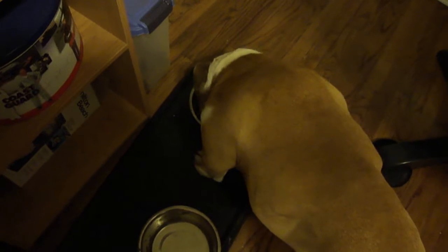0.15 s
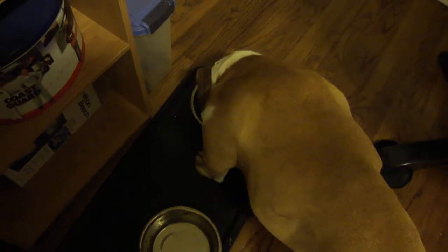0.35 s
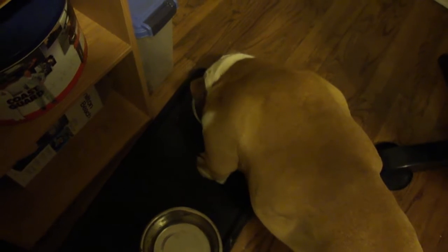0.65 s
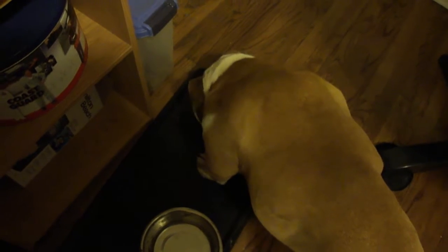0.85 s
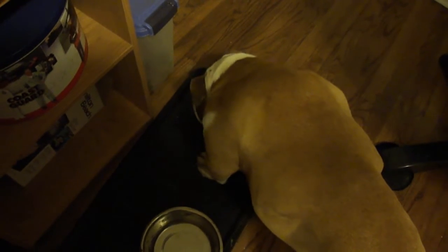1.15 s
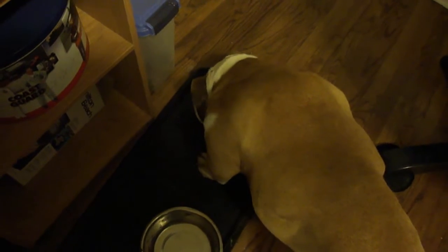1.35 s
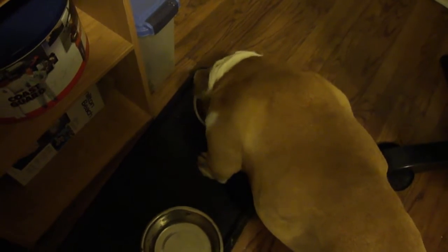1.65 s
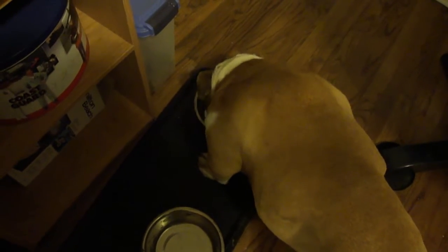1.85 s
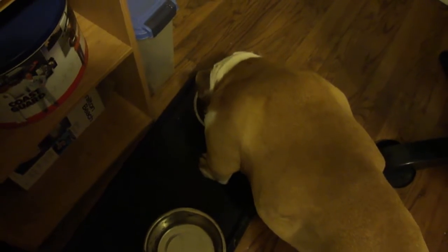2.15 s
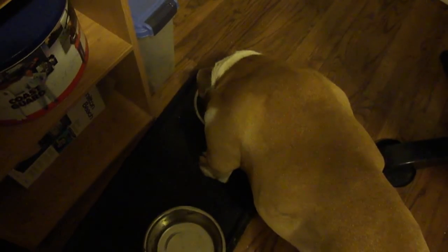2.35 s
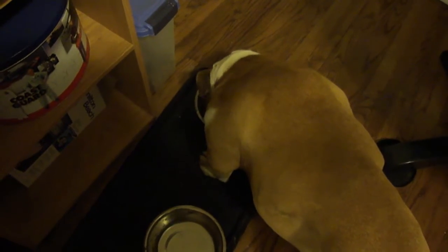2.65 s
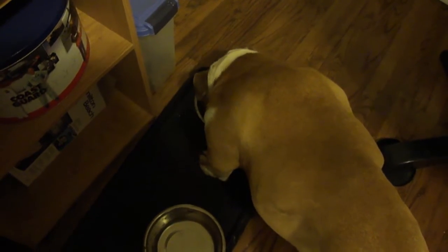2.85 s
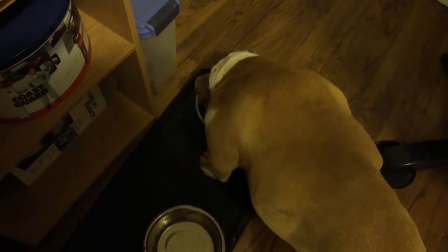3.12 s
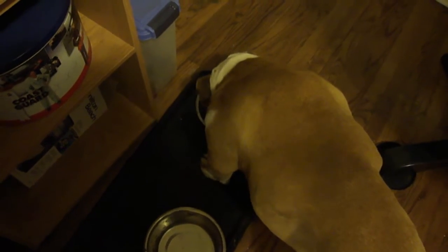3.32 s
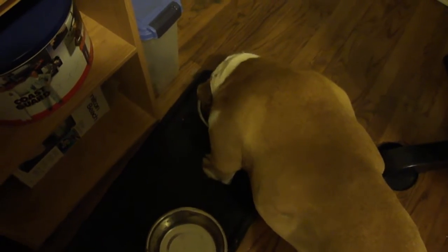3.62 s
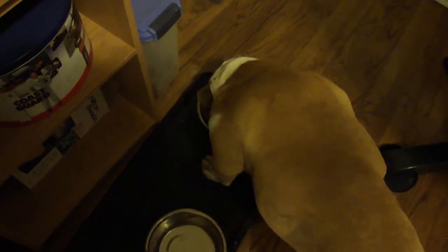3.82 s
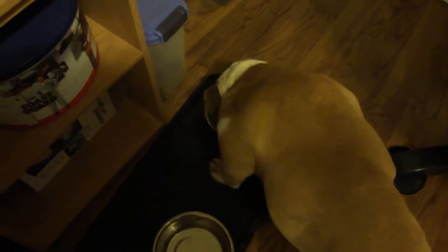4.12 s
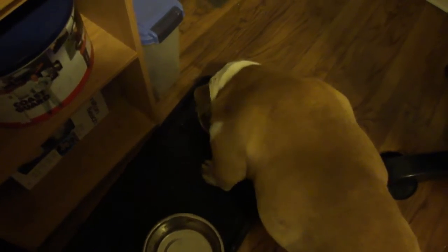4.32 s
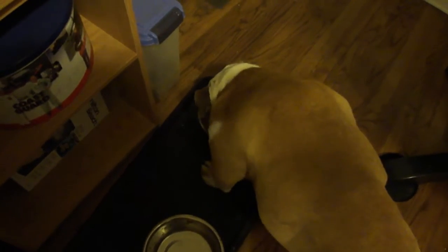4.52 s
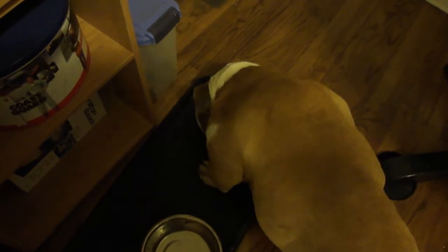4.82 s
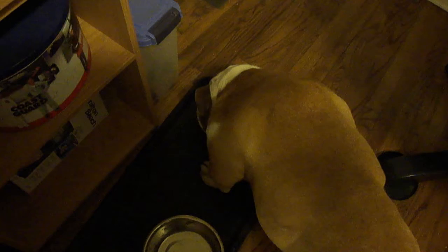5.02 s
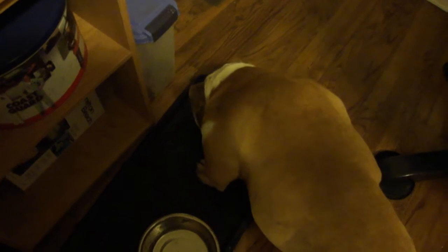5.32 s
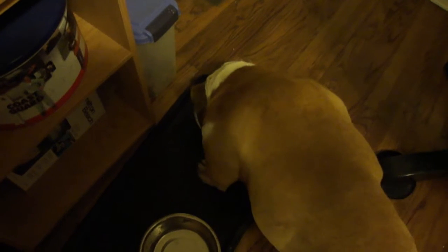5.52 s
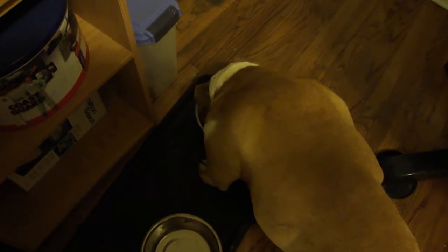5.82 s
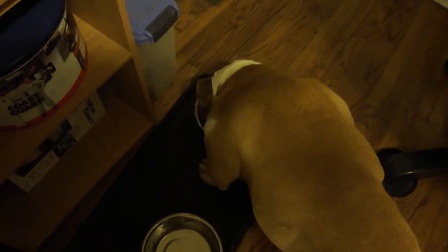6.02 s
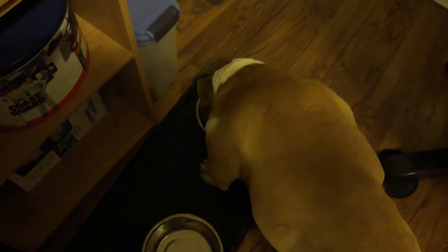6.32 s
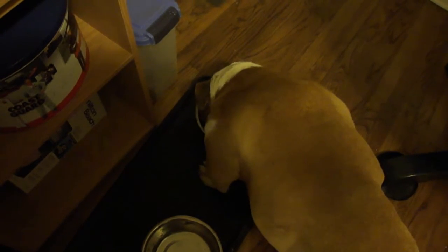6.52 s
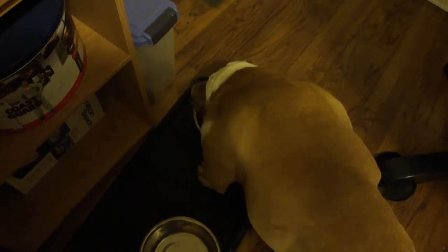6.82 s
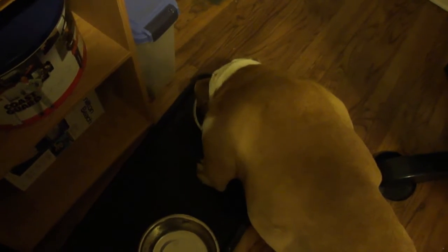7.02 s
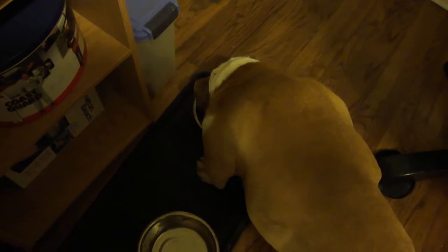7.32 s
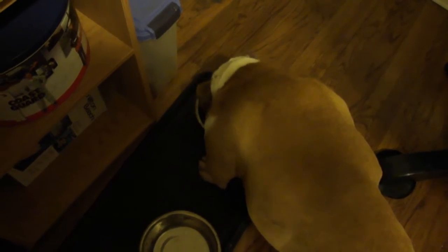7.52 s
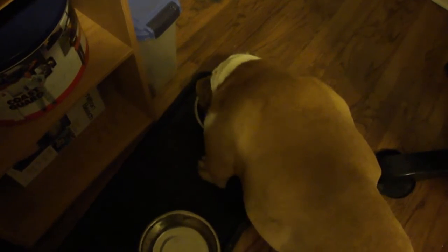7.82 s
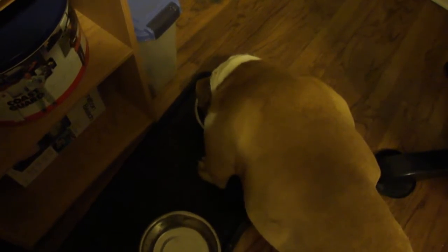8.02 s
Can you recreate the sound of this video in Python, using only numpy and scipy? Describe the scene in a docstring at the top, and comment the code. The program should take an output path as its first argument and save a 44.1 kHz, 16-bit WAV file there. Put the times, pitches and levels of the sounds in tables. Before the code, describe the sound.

Close to the microphone, a dog laps and chomps wet food from start to finish. The quick, even mouthfuls squish, smack and slurp, with small gulps and bright snaps of saliva, all colored by the hollow of the bowl. Now and then there is a sharp click or a very faint throat rumble. The small indoor room adds a short echo and soft hiss.

```python
"""Wet food squelches as a dog laps and gulps from a bowl on the hard floor of a small room.
Bubbles pop in the mash, tongue and lips smack, air pockets gulp low and saliva threads snap;
the bowl's hollow rings with all of it. Now and then a thin tone lingers or the throat rumbles.
One microphone stands close by, with the room's short echo, hiss and a faint hum behind the dog."""
import sys
import numpy as np
from scipy import signal
from scipy.fft import rfft, irfft
from scipy.io import wavfile
from scipy.ndimage import uniform_filter1d

SR = 44100
rng = np.random.default_rng(int(sys.argv[2]) if len(sys.argv) > 2 else 0)


def to_wav(sig):
    """Store sig (one row per channel, or 1-D mono) as 16-bit WAV at the path in sys.argv[1].

    Samples outside -1..1 are clipped; the rate is SR.
    """
    pcm = np.clip(np.atleast_2d(sig), -1, 1) * 32767
    pcm = np.round(pcm).astype(np.int16)
    wavfile.write(sys.argv[1], SR, pcm.T)  # frames by channels


N = 359855

# tongue plunges, then jaws squeeze: start_s, plunge_db, wait_s, squeeze_db, settle_db_per_s
BITES = [(.01, -40.5, 0.11, -37.5, 60), (0.177, -27.5, 0.11, -20, 140), (0.511, -23.5, 0.12, -17.5, 166),
         (0.849, -29, 0.12, -19.5, 188), (1.347, -23.5, 0.12, -18, 169), (1.659, -34, 0.098, -18, 108),
         (1.94, -38, 0.087, -31, 66), (2.093, -18.5, 0.018, -20, 155), (2.425, -42, 0.013, -50, 203),
         (2.514, -23, 0.13, -21.5, 193), (2.865, -17, 0.097, -17, 195), (3.216, -21, 0.068, -17.5, 242),
         (3.688, -25.5, 0.1, -20.5, 92), (4.012, -22, 0.096, -19.5, 146), (4.324, -26.5, 0.099, -21.5, 138),
         (4.802, -25.5, 0.1, -23.5, 136), (5.142, -23, 0.09, -19.5, 156), (5.484, -22.5, 0.087, -21.5, 174),
         (5.943, -25.5, 0.13, -25, 133), (6.289, -24.5, 0.095, -16, 176), (6.597, -29.5, 0.11, -20.5, 185),
         (7.089, -23.5, 0.12, -22.5, 128), (7.444, -18, 0.086, -20, 106), (7.741, -19.5, 0.12, -19, 185)]
# tone colour of the squelching food: frequency_hz, density_db
MASH_SPECTRUM = [(59, -64), (100, -73), (246, -8), (379, 9), (656, 0.5), (952, 1), (1380, -10.5),
                 (1930, -10.5), (3750, -22.5), (10800, -43), (14000, -68), (22000, -120)]
# small bubbles in the mash: start_s, level_db, pitch_hz
POPS = [(0.103, -34.5, 1000), (0.166, -24.5, 1250), (0.176, -24, 1003), (0.178, -33, 1506),
        (0.237, -27.5, 1110), (0.473, -27.5, 1115), (0.509, -27.5, 1088), (0.549, -26, 987),
        (0.698, -24.5, 1013), (0.866, -27, 1050), (0.934, -21.5, 1020), (0.981, -21.5, 860),
        (1.055, -30, 1020), (1.225, -41, 886), (1.253, -36, 1003), (1.346, -21.5, 1046), (1.47, -13, 998),
        (1.662, -19, 1075), (1.761, -15.5, 1042), (1.802, -19, 1001), (2.015, -29.5, 896),
        (2.064, -28, 980), (2.092, -18, 1040), (2.123, -18.5, 1220), (2.139, -14.5, 865),
        (2.425, -33.5, 1000), (2.525, -28.5, 1054), (2.543, -23, 990), (2.626, -19.5, 1030),
        (2.644, -16.5, 1167), (2.823, -28.5, 1230), (2.862, -27, 984), (2.872, -19.5, 933),
        (2.909, -40, 1080), (2.953, -20, 940), (2.964, -15, 1212), (3.142, -34, 1160), (3.174, -33.5, 940),
        (3.215, -22.5, 980), (3.277, -39, 1180), (3.316, -25, 1039), (3.6, -38, 925), (3.694, -32, 940),
        (3.74, -26.5, 1060), (3.802, -31, 1127), (3.815, -22.5, 1120), (4.022, -23.5, 1060),
        (4.04, -22.5, 1012), (4.059, -40, 1054), (4.111, -16.5, 960), (4.112, -20, 754), (4.15, -24, 1020),
        (4.317, -27, 2860), (4.323, -33, 936), (4.353, -25, 920), (4.407, -25, 1018), (4.447, -19, 777),
        (4.728, -39, 960), (4.808, -22, 995), (4.85, -19, 780), (4.908, -16, 747), (5.139, -19.5, 1105),
        (5.146, -16.5, 987), (5.234, -14, 824), (5.321, -31, 1130), (5.403, -30.5, 1210), (5.488, -33, 960),
        (5.541, -32, 937), (5.583, -23.5, 880), (5.649, -28, 1060), (5.867, -38, 1066), (5.958, -25.5, 930),
        (6.004, -24, 1046), (6.079, -22.5, 1021), (6.362, -27, 1060), (6.383, -18, 1077),
        (6.404, -19.5, 1174), (6.684, -28, 1094), (6.71, -18, 988), (6.709, -44, 1580), (7.101, -37, 912),
        (7.197, -20, 1030), (7.224, -19, 898), (7.376, -32, 1210), (7.399, -27.5, 1450),
        (7.446, -18.5, 937), (7.52, -20, 1048), (7.545, -17, 1010), (7.746, -22.5, 1404), (7.781, -18, 915),
        (7.865, -19.5, 754), (7.872, -17, 1037), (7.912, -28, 1040)]
# tongue and lips tearing free: start_s, level_db, mouth_hz, width_ratio
SMACKS = [(0.169, -27, 2340, 0.55), (0.228, -21.5, 2480, 1), (0.285, -36, 3660, 0.4),
          (0.501, -22, 1490, 0.56), (0.57, -25.5, 1960, 1), (0.627, -25, 2300, 0.24),
          (0.845, -25.5, 2260, 1), (0.928, -28, 2200, 1), (1.345, -16, 1790, 0.97),
          (1.392, -31.5, 3660, 0.35), (1.433, -27.5, 4100, 0.37), (1.446, -18, 1710, 1),
          (1.517, -28, 3300, 0.98), (1.662, -16.5, 1840, 1), (1.697, -22, 3560, 0.34), (1.78, -18, 1666, 1),
          (1.809, -25.5, 2500, 0.75), (1.952, -28, 1884, 0.81), (2.004, -33, 3050, 0.59),
          (2.129, -23.5, 1550, 1), (2.236, -34.5, 2050, 0.27), (2.423, -39.5, 2780, 0.27),
          (2.518, -27.5, 3210, 0.19), (2.544, -26, 1640, 0.56), (2.571, -29.5, 2630, 0.17),
          (2.614, -29, 1530, 0.8), (2.634, -14, 2094, 0.33), (2.858, -25, 2030, 0.39),
          (2.865, -19, 2750, 1), (2.951, -29, 1770, 0.35), (2.9648, -21, 3050, 1), (3.173, -32, 1640, 0.65),
          (3.213, -27, 3790, 0.51), (3.307, -28, 3660, 0.27), (3.687, -15.5, 2730, 0.44),
          (3.7918, -18.5, 2340, 0.65), (3.8153, -25, 1440, 0.37), (4.007, -18.5, 1980, 0.48),
          (4.034, -23.5, 3470, 0.87), (4.1083, -22.5, 2050, 0.49), (4.122, -18.5, 1686, 0.44),
          (4.318, -18.5, 2120, 0.53), (4.373, -31.5, 3747, 0.24), (4.5274, -31.5, 1970, 0.17),
          (4.8064, -24, 2270, 0.84), (4.848, -22.5, 1800, 1), (4.973, -29, 1590, 0.55),
          (5.14, -18, 2740, 0.67), (5.203, -27, 2480, 0.89), (5.232, -19.5, 1640, 0.78),
          (5.474, -36, 2520, 0.69), (5.9418, -23, 2633, 0.47), (5.998, -23, 1880, 1),
          (6.0672, -15.5, 1730, 1), (6.1083, -22, 2560, 0.42), (6.266, -30, 1450, 1),
          (6.383, -13.5, 1990, 1), (6.393, -19, 3300, 0.49), (6.587, -23, 1870, 0.96),
          (6.598, -21.5, 1740, 0.75), (6.7155, -18.5, 1354, 0.96), (7.085, -23.5, 2040, 0.69),
          (7.147, -24.5, 1990, 0.23), (7.1495, -25.5, 2770, 0.34), (7.197, -24, 1635, 0.87),
          (7.224, -27.5, 2720, 0.42), (7.357, -30, 2070, 0.47), (7.3782, -32, 1850, 0.26),
          (7.4102, -30, 3340, 1), (7.508, -30, 1700, 0.48), (7.526, -20.5, 1460, 0.5),
          (7.742, -13, 1980, 0.55), (7.865, -20, 1840, 0.83)]
# large air pockets under the tongue: start_s, level_db, pitch_hz, ring_s
GULPS = [(0.202, -27, 498, 0.05), (0.283, -17.5, 350, 0.028), (0.306, -22, 445, 0.016),
         (0.527, -24, 456, 0.053), (0.614, -15, 410, 0.025), (0.895, -30, 443, 0.027),
         (0.925, -19.5, 367, 0.014), (0.96, -12.5, 474, 0.0081), (1.355, -27, 386, 0.064),
         (1.446, -17.5, 406, 0.016), (1.7, -13, 394, 0.022), (1.757, -12.5, 406, 0.012),
         (2.048, -36, 510, 0.043), (2.086, -22.5, 271, 0.022), (2.095, -21.5, 405, 0.042),
         (2.545, -33, 440, 0.025), (2.614, -13.5, 376, 0.014), (2.872, -17.5, 426, 0.029),
         (3.214, -22.5, 473, 0.027), (3.277, -17.5, 445, 0.0053), (3.458, -32.5, 424, 0.0072),
         (3.692, -26, 415, 0.021), (3.718, -24.5, 514, 0.021), (3.792, -22.5, 433, 0.075),
         (4.033, -22, 407, 0.04), (4.106, -22, 500, 0.013), (4.404, -19, 397, 0.013),
         (4.439, -16.5, 400, 0.0083), (4.898, -11.5, 452, 0.018), (5.14, -31, 353, 0.03),
         (5.205, -20.5, 361, 0.055), (5.485, -24.5, 406, 0.027), (5.54, -21, 342, 0.026),
         (5.988, -34, 420, 0.037), (6.042, -23.5, 455, 0.02), (6.295, -17, 428, 0.018),
         (6.368, -14, 480, 0.022), (6.642, -11, 393, 0.032), (6.712, -15, 417, 0.02),
         (7.199, -9.5, 460, 0.018), (7.445, -8, 428, 0.0081), (7.52, -10.5, 474, 0.015),
         (7.61, -22.5, 566, 0.039), (7.778, -13, 399.6, 0.011), (7.859, -19.5, 432, 0.019)]
# saliva threads snapping: start_s, level_db, centre_hz
SALIVA_SNAPS = [(0.285, -20.5, 4050), (.372, -36.5, 5800), (0.53, -33.5, 6100), (1.343, -30, 5350),
                (1.445, -26.5, 5750), (1.594, -38.5, 4950), (1.66, -32.5, 4150), (1.6989, -23, 4630),
                (1.78, -29, 6100), (1.939, -36, 4870), (2.098, -32.5, 6400), (2.36, -52, 9300),
                (2.5036, -47, 5530), (2.569, -38, 6290), (2.616, -29.5, 5870), (2.859, -31, 6705),
                (3.2136, -30.5, 6000), (3.687, -35, 8900), (3.7205, -31, 5440), (3.803, -35, 5840),
                (4.034, -32, 9200), (4.798, -38, 5270), (4.848, -28.5, 5340), (4.951, -43, 8850),
                (5.142, -34, 5600), (5.239, -32, 5800), (5.484, -31, 3650), (5.506, -34, 5960),
                (5.612, -42, 7860), (5.937, -39, 5250), (6.039, -30.5, 5870), (6.291, -39, 4870),
                (6.593, -40, 5050), (6.643, -25.5, 4600), (7.0836, -35, 5650), (7.149, -31, 7250),
                (7.364, -35.5, 6500), (7.442, -27, 6150), (7.52, -32.5, 5000), (7.741, -29.5, 3970),
                (7.78, -34, 5200)]
# air pockets squeezed small: start_s, level_db, start_hz, growth_per_s, length_s
CHIRPS = [(0.622, -18.5, 622, 34, 0.031), (3.775, -31, 1124, 23.6, 0.035), (7.866, -21, 1408, 16, 0.016)]
# thin tones lingering after bites: start_s, level_db, pitch_hz, length_s
THIN_TONES = [(1.945, -39, 2010, 0.11), (3.182, -36, 2015, 0.057), (3.845, -46, 953, 0.33),
              (4.12, -32, 568.4, 0.13), (6.731, -41.5, 2073, 0.1), (6.803, -45, 2420, 0.078)]
# rumbles in the throat: start_s, level_db, pitch_hz
GRUNTS = [(2.1, -54.5, 197), (3.85, -48, 162), (4.401, -54, 210)]
# dry single clicks: start_s, level_db
TICKS = [(2.776, -25), (2.793, -40), (3.14, -36), (3.175, -33), (6.069, -18), (6.3846, -14)]
# resonances of the bowl's hollow: pitch_hz, width_hz, level_db
BOWL_MODES = [(374.3, 25, 4), (413, 35, -5), (959, 35.6, 8), (1143, 48, 10), (1570, 63, 9), (1924, 30, 5),
              (3650, 850, 4.5)]
# early reflections at the microphone: delay_s, level_db
ECHOES = [(0.025, -14.5), (0.035, -13), (.049, -18.5)]
# the room's reverberation: frequency_hz, t60_s
ROOM_DECAY = [(150, 0.46), (400, 0.53), (1000, 0.47), (2800, 0.43), (7000, 0.36)]
# room and microphone hiss: frequency_hz, density_db
HISS_SPECTRUM = [(15, -48), (25, -16.5), (196, 6), (361, 3), (813, 7), (1350, 7.5), (1660, 6), (2310, -1.5),
                 (3640, -5.5), (4350, -8), (10900, -12), (14100, -51), (22000, -120)]

BODY_HZ = 604  # below this the mash thins out as it settles


def gain_of(db):
    return 10 ** (np.asarray(db) / 20)


def unit_rms(x):
    return x / np.sqrt(np.mean(x ** 2) + 1e-20)


def curve_at(points, hz):
    knots_hz, values = np.transpose(points)
    return np.interp(np.log(hz + 1), np.log(knots_hz + 1), values)


def add(mix, start_s, sound):
    part = mix[round(start_s * SR):][:len(sound)]
    part += sound[:len(part)]


def resonate(x, hz, width_hz):
    pole = np.exp((2j * np.pi * hz - np.pi * width_hz) / SR)
    return 2 * signal.lfilter([1 - abs(pole)], [1, -pole], x).real


def phase_wobble(noise, samples):
    return 0.7 * unit_rms(uniform_filter1d(uniform_filter1d(noise, samples), samples))


def puff(length_s, rise_s, crackle_db):
    """Crackly noise and its envelope: quick rise, short hold, rounded fall."""
    hiss, crackle = rng.standard_normal((2, SR // 10))
    t = np.arange(len(hiss)) / SR
    envelope = (1 - np.exp(-t / rise_s)) * np.exp(-(t / length_s) ** 2)
    return hiss * gain_of(crackle_db * unit_rms(uniform_filter1d(crackle, size=90))), envelope


def bite_motion(t, contact_db=-15, approach_db_per_s=123, plunge_s=0.015, sag_db=8):
    """Each bite nears the mash, plunges, sags, squeezes and settles; the loudest sets level and colour."""
    start_s, plunge_db, wait_s, squeeze_db, settle_db_per_s = np.transpose(BITES)[:, :, None]
    since_s = t - start_s
    settling_s = np.maximum(since_s - wait_s, 0)
    progress = np.clip(since_s / wait_s, 0, 1)
    near_db = contact_db * np.clip(-since_s / plunge_s, 0, 1) + approach_db_per_s * np.minimum(since_s, 0)
    push_db = plunge_db + (squeeze_db - plunge_db) * progress - sag_db * np.sin(np.pi * progress)
    level_db = push_db + near_db - settle_db_per_s * settling_s
    tilt_db_per_oct = np.clip(4.5 - 17 * settling_s, -8, 8)  # the treble dies first
    thin_db_per_oct = 0.5 * (1 - progress) + 94 * settling_s  # the bass is fullest at the squeeze
    loudest = level_db.argmax(axis=0), np.arange(len(t))
    return level_db[loudest], tilt_db_per_oct[loudest], thin_db_per_oct[loudest]


def squelch(step=32):
    """Many tiny bubbles of every size burst at random, more loudly as the tongue pushes."""
    level_db, tilt, thinning = bite_motion(np.arange(N // step + 1) * step / SR)
    out = np.zeros(N)
    for hz in np.geomspace(150, 10500, num=40):
        bursts = np.flatnonzero(rng.random(N) < 0.09 * hz / SR)
        spread_db = 2.5 * np.minimum(rng.exponential(1, len(bursts)), 2 if hz < BODY_HZ else 4)
        bunching = unit_rms(uniform_filter1d(rng.standard_normal(len(level_db)), size=24))
        clumps_db = 5.14 * np.clip(bunching, -3, 1.5 if hz < 4000 else 2.5)
        colour_db = tilt * np.log2(hz / 2000) + thinning * min(np.log2(hz / BODY_HZ), 0)
        impulses = np.zeros(N)
        impulses[bursts] = gain_of(spread_db + (level_db + colour_db + clumps_db)[bursts // step])
        cycles = np.arange(round(9 * SR / hz)) * hz / SR
        envelope = np.sin(np.pi * cycles / cycles[-1]) * np.exp(-0.2 * cycles)
        bubble = envelope * np.sin(2 * np.pi * cycles * (1 + 0.013 * cycles))
        band_gain = gain_of(curve_at(MASH_SPECTRUM, hz)) * np.sqrt(hz / 1000)
        out += band_gain * signal.oaconvolve(impulses, bubble)[:N]
    return gain_of(-6) * out


def bubbles(rows, rise_s, climb_per_s):
    """An air pocket rings as a dying sine that climbs as it shrinks; its soft walls make it flutter."""
    out = np.zeros(N)
    for start_s, db, hz, ring_s in rows:
        t = np.arange(0, ring_s, 1 / SR)
        envelope = (1 - np.exp(-t / rise_s)) ** 2 * gain_of(-60 * (t / ring_s) ** 1.65)
        flutter = phase_wobble(rng.standard_normal(SR // 10), samples=90)[:len(t)]
        tone = np.sin(2 * np.pi * hz * t * (1 + climb_per_s * t) + flutter - flutter[0])
        add(out, start_s, gain_of(db) * envelope / envelope.max() * tone)
    return out


def smacks():
    """A wet film tears in a crackly puff, heard through the mouth cavity and three pitched pockets."""
    out = np.zeros(N)
    scatter = np.clip(rng.standard_normal((len(SMACKS), 3)), -2, 2)
    for (start_s, db, mouth_hz, width_ratio), offsets in zip(SMACKS, scatter):
        tear, envelope = puff(length_s=0.019, rise_s=0.00019, crackle_db=0.5)
        envelope *= 1 + 0.93 * np.exp(-np.arange(len(envelope)) / (0.0011 * SR))  # it snaps first
        for _ in range(3):  # three passes give the cavity steep skirts
            tear = resonate(tear, mouth_hz, max(width_ratio, 0.2) * mouth_hz)
        pockets_hz = mouth_hz * np.exp(0.219 * width_ratio * offsets)
        pockets = sum(resonate(tear, hz, 0.032 * hz) for hz in pockets_hz)
        smack = (unit_rms(tear) + 0.46 * unit_rms(pockets))[::-1]  # reversed to start at full ring
        add(out, start_s, 0.35 * gain_of(db) * envelope * smack)
    return out


def saliva_snaps():
    """Saliva threads snap in short bright hisses; faint snaps are narrow and pitched, strong ones broad."""
    out = np.zeros(N)
    for start_s, db, hz in SALIVA_SNAPS:
        noise, envelope = puff(length_s=0.019, rise_s=0.0004, crackle_db=3)
        width_hz = 4200 * gain_of(0.41 * (db + 30))
        hiss = resonate(resonate(noise, hz, width_hz), hz, width_hz)
        ring = resonate(resonate(hiss, hz, width_hz=770), hz, width_hz=910)
        add(out, start_s, 0.44 * gain_of(db) * envelope * (unit_rms(hiss) + 0.54 * unit_rms(ring)))
    return out


def chirps():
    """A pocket squeezed small swells and cuts off while its pitch runs up ever faster."""
    out = np.zeros(N)
    for start_s, db, hz, growth_per_s, length_s in CHIRPS:
        t = np.arange(0, length_s, 1 / SR)
        envelope = np.sin(np.pi * (t / length_s) ** 0.89)
        cycles = hz * np.expm1(growth_per_s * t) / growth_per_s
        add(out, start_s, gain_of(db) * envelope * np.sin(2 * np.pi * cycles))
    return out


def thin_tones():
    """Wavering thin tones swell quickly and fade."""
    out = np.zeros(N)
    for start_s, db, hz, length_s in THIN_TONES:
        t = np.arange(0, length_s, 1 / SR)
        waver = phase_wobble(rng.standard_normal(SR // 2), samples=300)[:len(t)]
        envelope = np.sin(np.pi * np.sqrt(t / length_s))
        add(out, start_s, gain_of(db) * envelope * np.sin(2 * np.pi * hz * t + waver))
    return out


def grunts():
    """The throat rumbles in brief swells of rough low noise."""
    out = np.zeros(N)
    for start_s, db, hz in GRUNTS:
        throat = signal.butter(4, [0.69 * hz, 1.71 * hz], "band", fs=SR, output="sos")
        rumble = signal.sosfilt(throat, rng.standard_normal(SR // 5))
        add(out, start_s, gain_of(db) * unit_rms(rumble) * np.hanning(len(rumble)))
    return out


def ticks():
    """Each click is one sharp swing of pressure, the loud ones longer and so duller."""
    out = np.zeros(N)
    for start_s, db in TICKS:
        width_s = 7e-5 * gain_of(0.3 * (db + 14))
        widths = np.arange(-3, 3, 1 / (SR * width_s))
        add(out, start_s, -gain_of(db) * widths * np.exp(0.5 - widths ** 2 / 2))
    return out


def bowl(x):
    """The bowl's hollow lifts a few bands, which drift as the muzzle fills more or less of it."""
    t = np.arange(N) / SR
    drift = unit_rms(np.interp(t, np.linspace(0, t[-1], num=40), rng.standard_normal(40)))
    drifting_time_s = np.cumsum(1 + 0.025 * drift) / SR
    ring = np.zeros(N)
    for hz, width_hz, db in BOWL_MODES:
        carrier = np.exp(2j * np.pi * hz * drifting_time_s)
        pole = np.exp(-np.pi * width_hz / SR)
        ring += gain_of(db) * 2 * (carrier * signal.lfilter([1 - pole], [1, -pole], x / carrier)).real
    return x + gain_of(-7.5) * ring


def room(x, build_up_s=0.0011, tail_db=-6.5):
    """Dull echoes off shelf, walls and ceiling reach the microphone, with a tail dying band by band."""
    paths, echoes = np.zeros((2, SR))
    slots = np.arange(100, SR - 20, 20)
    paths[slots + rng.integers(0, 20, len(slots))] = rng.choice([-1., 1.], len(slots))
    paths *= 1 - np.exp(-(np.arange(SR) / SR / build_up_s) ** 2)  # the tail grows as paths multiply
    hz, t, bands = signal.stft(paths, SR, nperseg=256)
    decay = gain_of(-60 * t / curve_at(ROOM_DECAY, hz)[:, None])
    tail = signal.istft(bands * decay, SR, nperseg=256)[1][:SR]
    for delay_s, db in ECHOES:
        echoes[round(delay_s * SR)] = gain_of(db)
    echoes = signal.sosfilt(signal.butter(1, 2500, fs=SR, output="sos"), echoes)
    return x + signal.fftconvolve(x, echoes + gain_of(tail_db) * tail / np.linalg.norm(tail))[:N]


def room_tone(hiss_db=-52.5, hum_hz=130.5, hum_db=-72):
    """Steady room and microphone hiss with a mains hum, behind everything."""
    colour = gain_of(curve_at(HISS_SPECTRUM, np.fft.rfftfreq(N, 1 / SR)))
    hiss = irfft(rfft(rng.standard_normal(N)) * colour, N)
    hum = np.sqrt(2) * np.sin(2 * np.pi * hum_hz * np.arange(N) / SR)
    return gain_of(hiss_db) * unit_rms(hiss) + gain_of(hum_db) * hum


def scene():
    """The dog at its bowl, close up and in mono, with the room around it."""
    gulps = bubbles(GULPS, rise_s=0.0011, climb_per_s=1.5)
    pop_ring_s = 0.035
    pops = bubbles([row + (pop_ring_s,) for row in POPS], rise_s=0.00066, climb_per_s=2.4)
    eating = gulps + pops + chirps() + smacks() + ticks() + saliva_snaps() + squelch()
    low_cut = signal.butter(6, 255, "high", fs=SR, output="sos")  # a small source radiates no bass
    dog = bowl(signal.sosfilt(low_cut, eating)) + thin_tones() + grunts()
    return (room(dog) + room_tone())[None]


def record(dry):
    """The microphone bends slightly on loud peaks, and the top treble is cut off."""
    bent = dry + 0.12 * dry ** 2 * abs(dry)
    high_cut = signal.firwin(1023, cutoff=11000, window=("kaiser", 9), fs=SR)
    return signal.oaconvolve(bent, high_cut[None], "same")


dry = scene()
out = record(dry)
to_wav(out)
```